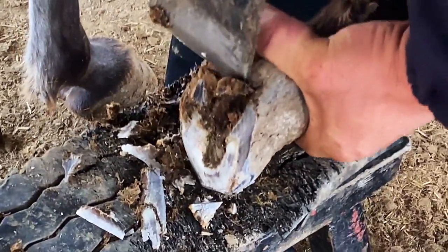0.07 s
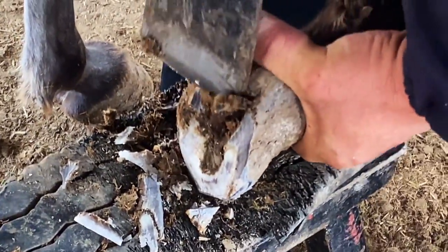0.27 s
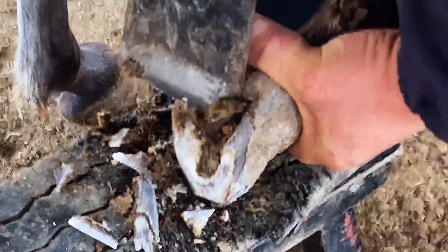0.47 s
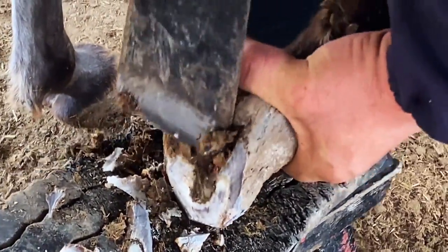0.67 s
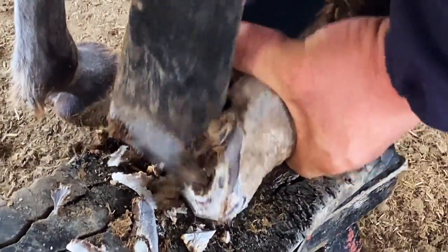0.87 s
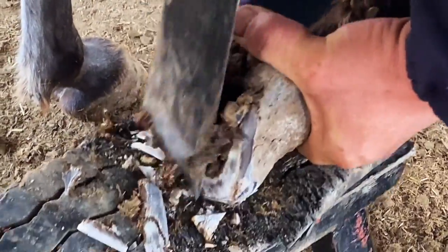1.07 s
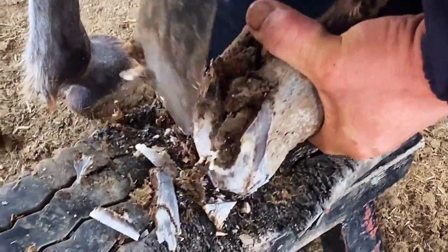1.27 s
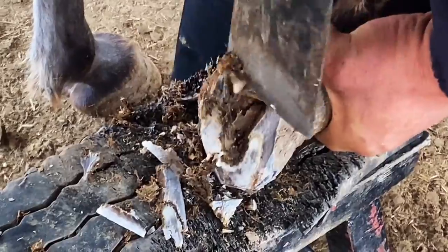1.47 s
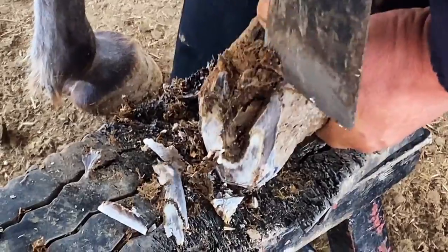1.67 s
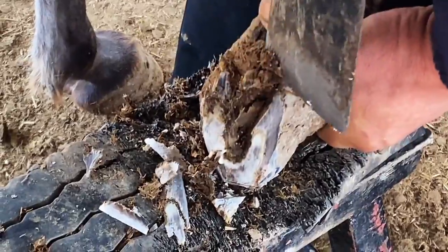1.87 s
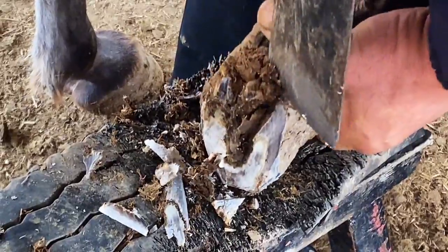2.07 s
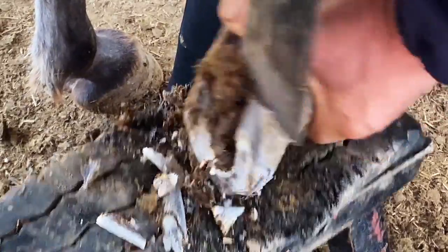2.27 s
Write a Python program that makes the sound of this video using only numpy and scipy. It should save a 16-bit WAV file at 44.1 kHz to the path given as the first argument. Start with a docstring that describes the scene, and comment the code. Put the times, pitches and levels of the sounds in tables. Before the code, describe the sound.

A blade pares hoof horn, close up, over steady low rumble with brief deep swells, a faint wavering hum and thin hiss. A sharp knock at 0.4 s drops into a soft bass thud. Light rasps follow from 0.55 s, crisp snaps around 0.85 s, a short woody tock at 1.02 s, sparse dull ticks from 1.26 to 1.83 s, then brighter snaps and a rasp from 2.12 s to the end.

```python
"""Over low rumble, wavering hum and steady hiss, a sharp knock sinks into a thud, then a blade pares a hoof.
Horn rasps under the edge and parts in small crisp snaps; the blade runs off the toe with a woody tock.
Snaps are noise bursts through horn resonances, the rasp is dense clicks, the knock a falling sine sweep.
The tock is one damped sine; rumble and hiss are coloured noise; hum and deep swells are narrow noise bands."""
import sys
import numpy as np
from scipy import signal
from scipy.fft import rfft, irfft
from scipy.io import wavfile

SR = 44100
rng = np.random.default_rng(int(sys.argv[2]) if len(sys.argv) > 2 else 0)


def waveform_to_disk(signal):
    """Save audio, clipped to [-1, 1], as 16-bit WAV at the path in sys.argv[1]."""
    frames = np.transpose(np.atleast_2d(signal))
    scaled = np.clip(frames, -1, 1) * 32767
    samples = np.round(scaled).astype(np.int16)
    wavfile.write(sys.argv[1], SR, samples)


N = 101429

SIDE_SPREAD = .5  # side gain of snap bodies and knock tick


def undb(db):
    """Decibels to gain."""
    return 10 ** (np.asarray(db) / 20)


def unit(x):
    """Scale to an rms of one."""
    return x / np.sqrt(np.mean(x ** 2))


def times_s():
    """Time of each sample."""
    return np.arange(N) / SR


def age_s(start_s):
    """Time since an onset, zero before it."""
    return np.maximum(times_s() - start_s, 0)


def freqs_hz():
    """Frequency of each spectral bin, at least 1 Hz."""
    return np.maximum(np.arange(N // 2 + 1) * SR / N, 1)


def colour(points):
    """Gain per bin from (f/Hz, level/dB) points, interpolated over log frequency."""
    hz, db = np.array(points, float).T
    return undb(np.interp(np.log(freqs_hz()), np.log(hz), db))


def bump(hz, octaves):
    """Gain per bin of one broad Gaussian resonance."""
    return np.exp(-.5 * (np.log2(freqs_hz() / hz) / octaves) ** 2)


def resonance(hz, width_hz):
    """Gain per bin of one Lorentzian peak."""
    return 1 / (1 + (2 * (freqs_hz() - hz) / width_hz) ** 2)


def noise(gain):
    """Noise with the given amplitude density per root Hz."""
    return irfft(rfft(rng.standard_normal(N)) * gain, N) * np.sqrt(SR / 2)


def stereo(mid, side):
    """Left and right from their common and differing parts."""
    return np.array([mid + side, mid - side])


def half_sines(events):
    """Sum of half-sine envelopes from (start/s, length/s, peak/dB) rows."""
    t = times_s()
    return sum(undb(db) * np.sin(np.pi * np.clip((t - start_s) / length_s, 0, 1))
               for start_s, length_s, db in events)


def hum_line(hz, width_hz):
    """Narrow noise band: a wavering tone with its level swings partly evened out, at unit rms."""
    steadiness = .7  # share of the dB swings removed
    z = signal.hilbert(noise(resonance(hz, width_hz)))
    return unit(z.real / np.abs(z) ** steadiness)


def minimum_phase(gain, n):
    """Causal spectrum of an n-sample filter, phase derived from the gain by folding its cepstrum."""
    bins = np.arange(n // 2 + 1) * N // n
    cepstrum = irfft(np.log(gain[bins] + 1e-3))
    return np.exp(rfft(cepstrum * (1 + np.sign(np.fft.fftfreq(n)))))


def burst(start_s, decay_s, gain):
    """Short fracture: a noise spurt with a gritty tail, spectrally evened, rings a causal filter."""
    n = 4096
    attack_s, crumble_db, crumble_decay_s = .0008, -22, .008
    age = np.arange(n) / SR
    crumble = undb(crumble_db) * np.exp(-age / crumble_decay_s)
    decay = np.exp(-np.maximum(age - attack_s, 0) / decay_s)
    env = np.minimum(age / attack_s, 1) * np.hypot(decay, crumble)
    breaks = rfft(env * rng.standard_normal(n))
    flat = irfft(breaks / np.abs(breaks))
    x = irfft(rfft(np.sqrt(env) * flat) * minimum_phase(gain, n))
    out, first = np.zeros(N + 2 * n), int(start_s * SR)
    out[first:first + n] = x * np.sqrt(np.sum(env ** 2) / np.sum(x ** 2))  # energy set by env
    return out[:N]


def rumble():
    """Low coloured noise, with independent common and differing parts."""
    # densities of the common and differing parts: f/Hz, level/dB per Hz
    mid_density = [(18, -100), (30, -82), (42, -63), (58, -57), (75, -62.5), (105, -63.5), (165, -69.5),
                   (250, -72.5), (360, -73.5), (430, -80.5), (560, -79), (630, -86), (800, -90),
                   (1200, -96.5), (1450, -94.5), (1900, -98.5), (3000, -112)]
    side_density = [(20, -104), (55, -78), (100, -80.5), (160, -84), (350, -83), (430, -85), (550, -80.5),
                    (640, -87.5), (850, -90), (1150, -92.5), (1400, -90), (1900, -101.5), (2400, -118),
                    (3200, -113), (3800, -135)]
    return stereo(noise(colour(mid_density)), noise(colour(side_density)))


def hum():
    """Wavering tones, each with independent common and differing parts."""
    # hum lines: f/Hz, width/Hz, mid level/dB, side level/dB re mid
    lines = [(192.8, 5, -52, -13.5), (290, 13, -60.5, -2), (348, 17, -58, -8), (482.6, 20, -57.5, 1)]
    out = 0
    for hz, width_hz, db, side_db in lines:
        side = undb(side_db) * hum_line(hz, width_hz)
        out = out + undb(db) * stereo(hum_line(hz, width_hz), side)
    return out


def hiss():
    """Steady centred coloured noise."""
    # hiss density: f/Hz, level/dB per Hz
    density = [(1000, -110), (2000, -100.5), (2500, -97), (3050, -97), (3600, -87.7), (4100, -90.5),
               (4650, -84.2), (5250, -87.5), (5800, -83.5), (7100, -87.5), (8000, -91.3), (9500, -95.8),
               (12400, -100.5), (13600, -109), (15300, -119)]
    return noise(colour(density))


def swells():
    """A deep narrow noise band rises and falls briefly now and then."""
    # swells of the deep rumble: start/s, length/s, peak level/dB
    swell_table = [(.17, .1, -41), (.335, .06, -37), (.77, .07, -40), (.885, .12, -39), (1.19, .14, -40.5),
                   (1.49, .1, -37), (1.875, .2, -39), (2.15, .08, -39)]
    return half_sines(swell_table) * hum_line(57, width_hz=10)


def knock():
    """Tick, hollow ring and tap, then a delayed bass thud; one falling sine carries tap and thud."""
    start_s = .4088
    sweep_hz, end_hz, fall_s, curve = 960, 39, .00212, 1.44
    tap_db, tap_decay_s, rise_s = -16.5, .006, .0035
    thud_db, thud_peak_s, thud_width_s = -15.3, .0226, .014
    tick_db, tick_hz, tick_decay_s = -37, 1580, .0005
    ring_db, ring_hz, ring_decay_s = -32, 490, .008
    lead_rad, lead_rise_s = 1.08, .004  # left leads right

    age = age_s(start_s)
    hz = end_hz + sweep_hz / (1 + (age / fall_s) ** curve)
    lead = lead_rad * (1 - np.exp(-(age / lead_rise_s) ** 2)) * np.array([[.5], [-.5]])
    swing = -np.sin(2 * np.pi * np.cumsum(hz * (age > 0)) / SR + lead)
    tap = undb(tap_db) * np.exp(-age / tap_decay_s)
    thud = undb(thud_db) * np.exp(-((age - thud_peak_s) / thud_width_s) ** 2)
    ring = undb(ring_db) * np.exp(-age / ring_decay_s) * np.sin(2 * np.pi * ring_hz * age)
    rise = 1 - np.exp(-age / rise_s)
    mid, side = (burst(start_s, tick_decay_s, bump(tick_hz, octaves=.3)) for _ in range(2))
    tick = undb(tick_db) * stereo(mid, SIDE_SPREAD * side)
    return rise * (swing * (tap + thud) + ring) + tick


def snaps():
    """Horn gives way: dull body, pitched crack and bright edge, all through the same resonances."""
    # snaps: t/s, decay/s, body f/Hz, body width/octaves, body level/dB,
    # crack f/Hz, crack width/octaves, crack level/dB, bright edge level/dB
    snap_table = [(0.510, .005, 620, .42, -45, 1500, .3, -60, -70),
                  (0.844, .004, 640, .3, -40, 2600, .3, -58, -62),
                  (0.8503, .003, 1080, .7, -40, 2800, .36, -36.8, -37),
                  (0.862, .005, 860, .35, -47, 2900, .3, -66, -64),
                  (0.941, .005, 950, .55, -51.5, 2900, .3, -64, -66),
                  (0.9635, .008, 2600, .5, -55, 2740, .11, -51.5, -52),
                  (1.261, .004, 1200, .55, -54, 2900, .3, -70, -70),
                  (1.505, .004, 1330, .43, -46.5, 2000, .3, -59, -66),
                  (1.583, .0044, 1280, .43, -48, 2300, .4, -57, -60),
                  (1.828, .0027, 950, .45, -45, 1600, .3, -51, -66),
                  (2.1252, .003, 1200, .7, -36, 3750, .28, -38, -38),
                  (2.1765, .004, 1530, .3, -43, 3070, .11, -45.5, -51),
                  (2.183, .003, 950, .4, -47.5, 3000, .2, -57, -62),
                  (2.245, .004, 1100, .55, -52.5, 2900, .3, -56, -50),
                  (2.2825, .003, 1800, .55, -56, 3800, .35, -47, -48)]
    # bright edge colour: f/Hz, level/dB
    edge_colour = [(2500, -22), (4400, -7), (5200, -7), (6000, 1), (7600, -1), (9500, -3), (12500, -3),
                   (15300, -6)]
    # resonances of hoof and blade: f/Hz, width/Hz, level/dB
    horn_modes = [(720, 160, 0), (940, 180, 1), (1400, 200, -1), (1700, 180, -1), (2330, 250, -1),
                  (2850, 500, -2), (3820, 380, -2), (4600, 400, -1), (5950, 600, 1), (7500, 600, -1)]
    floor_db = -10
    horn = undb(floor_db) + sum(undb(db) * resonance(hz, width_hz) for hz, width_hz, db in horn_modes)
    edge = horn * colour(edge_colour)
    out = 0
    for (start_s, decay_s, body_hz, body_oct, body_db,
         crack_hz, crack_oct, crack_db, edge_db) in snap_table:
        body = horn * bump(body_hz, body_oct)
        crack = horn * bump(crack_hz, crack_oct)
        mid = burst(start_s, decay_s, body)
        side = SIDE_SPREAD * burst(start_s, decay_s, body)
        out = out + undb(body_db) * stereo(mid, side)
        out = out + undb(crack_db) * burst(start_s, decay_s, crack)
        out = out + undb(edge_db) * burst(start_s, decay_s, edge)
    return out


def rasp():
    """Fibres tear as dense random clicks while each push swells and eases."""
    # pushes of the blade: start/s, length/s, peak level/dB
    pushes = [(0.55, .07, -51.5), (0.602, 0.09, -56), (0.767, .095, -51.5), (0.955, .04, -56),
              (1.03, 0.066, -60), (2.14, .09, -61), (2.225, .12, -51)]
    # rasp colour: f/Hz, relative level/dB
    rasp_colour = [(700, -7), (1500, -6), (2700, -3), (5000, -3), (8000, -1), (11000, -1), (13500, -1),
                   (15300, -4)]
    fibres_per_s, scatter_db = 5000, 3.5
    hits = rng.random(N) < fibres_per_s / SR
    clicks = hits * rng.standard_normal(N) * undb(scatter_db * rng.standard_normal(N))
    return half_sines(pushes) * unit(irfft(rfft(clicks) * colour(rasp_colour), N))


def tock():
    """The blade runs off the toe: one heavily damped woody mode."""
    # tock: t/s, f/Hz, level/dB before the envelope, attack/s, decay/s
    tock_mode = (1.0242, 810, -24, .001, .0017)
    start_s, hz, db, attack_s, decay_s = tock_mode
    lead_rad = -.6  # right leads left
    age = age_s(start_s)
    env = (1 - np.exp(-(age / attack_s) ** 2)) * np.exp(-age / decay_s)
    lead = lead_rad * np.array([[.5], [-.5]])
    return undb(db) * env * np.sin(2 * np.pi * hz * age + lead)


def scene():
    """Blade work and the knock over rumble, hum and hiss."""
    return rumble() + hum() + hiss() + swells() + knock() + snaps() + rasp() + tock()


def record(dry):
    """Two microphone ports drift out of phase in the high treble; a steep lowpass cuts the top."""
    # phase between the ports: f/Hz, phase/turns
    port_turns = [(7300, 0), (8000, .22), (9080, .5), (11200, 1), (13200, 1.5), (15300, 2)]
    top_hz = 15350
    hz, turns = np.array(port_turns).T
    half_rad = np.pi * np.interp(freqs_hz(), hz, turns)
    ports = irfft(rfft(dry) * np.exp(1j * np.array([half_rad, -half_rad])), N)
    lowpass = signal.ellip(10, .1, 80, top_hz, fs=SR, output="sos")
    return signal.sosfilt(lowpass, ports)


dry = scene()
out = record(dry)
waveform_to_disk(out)
```